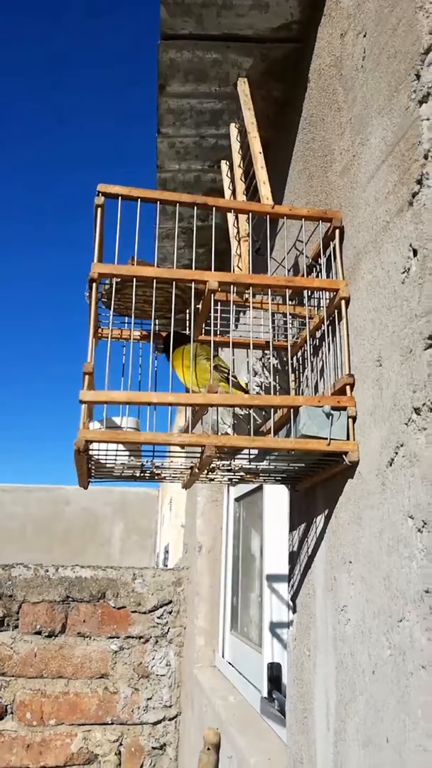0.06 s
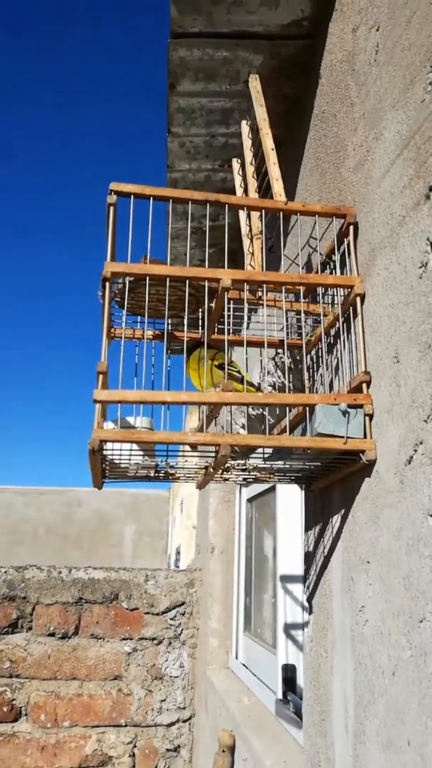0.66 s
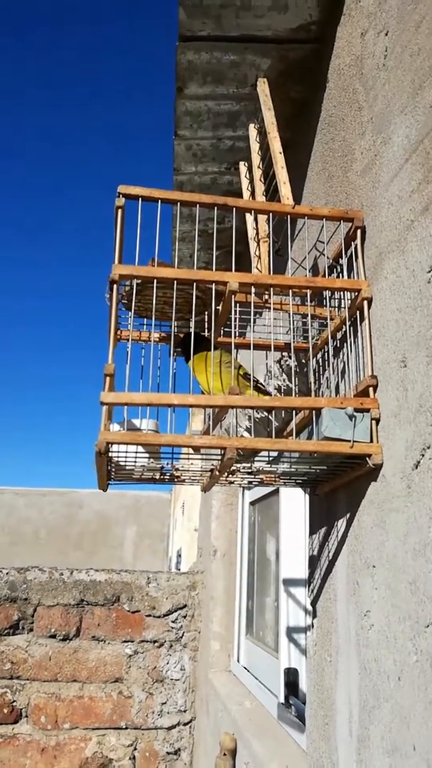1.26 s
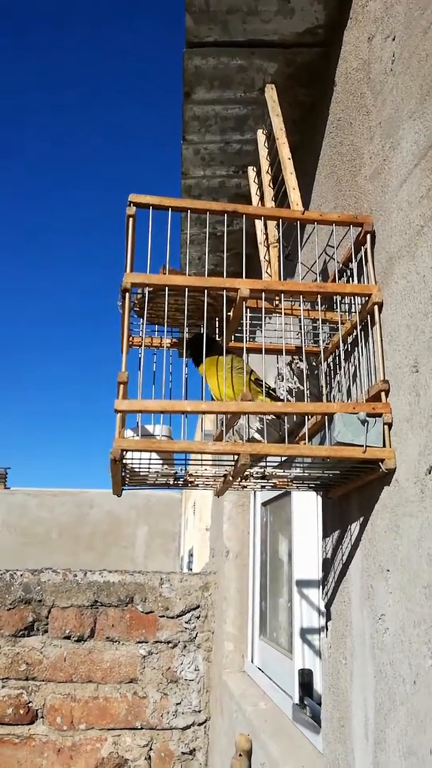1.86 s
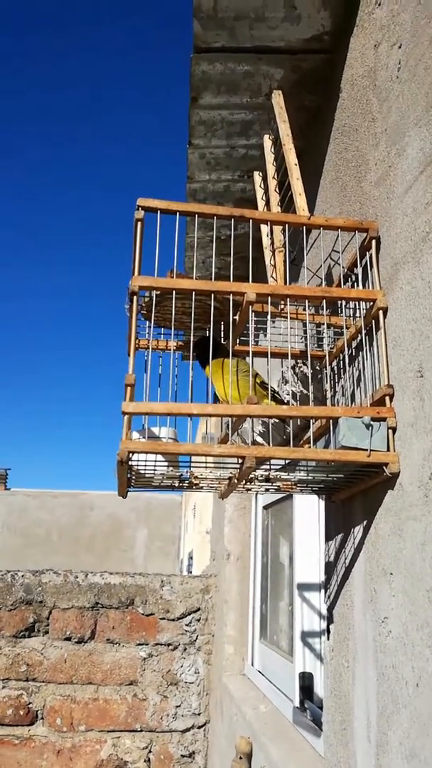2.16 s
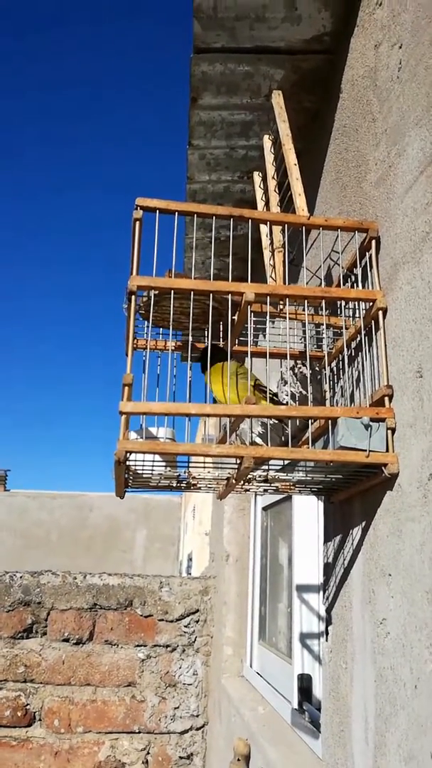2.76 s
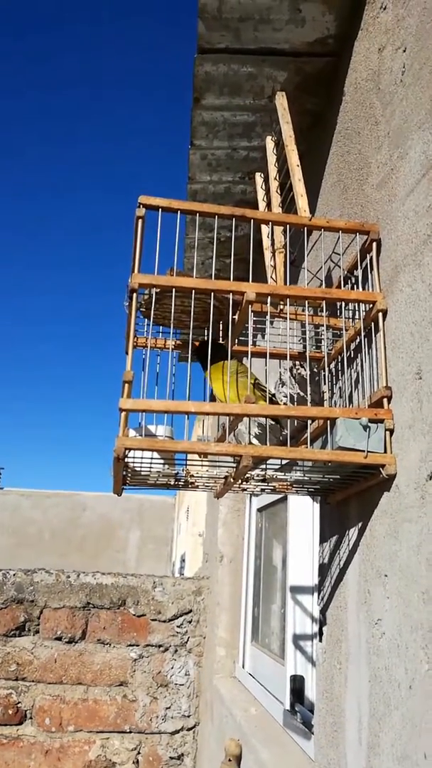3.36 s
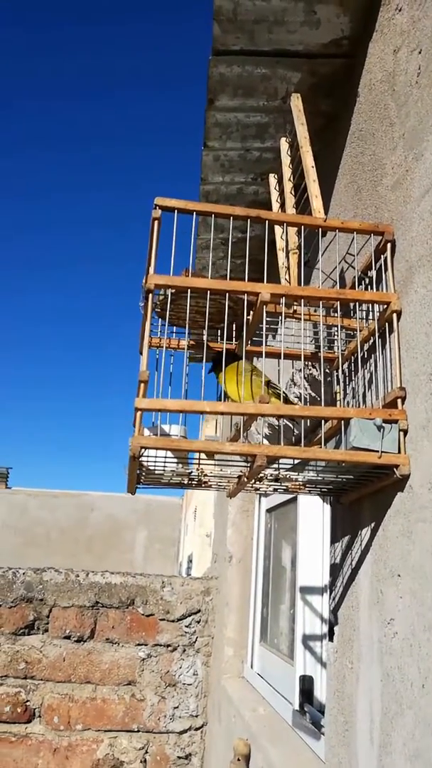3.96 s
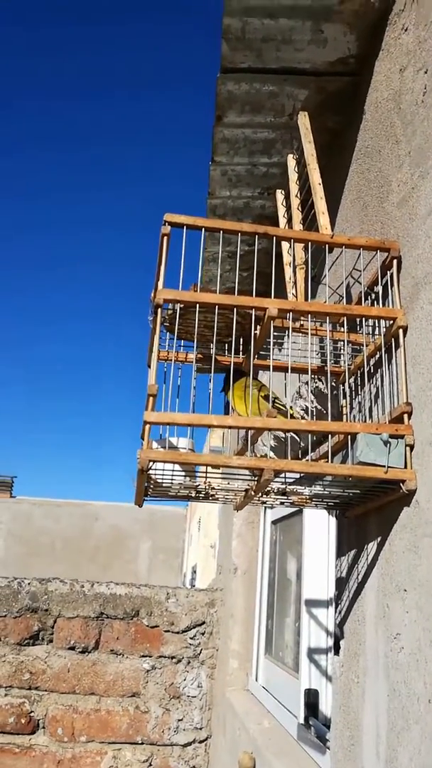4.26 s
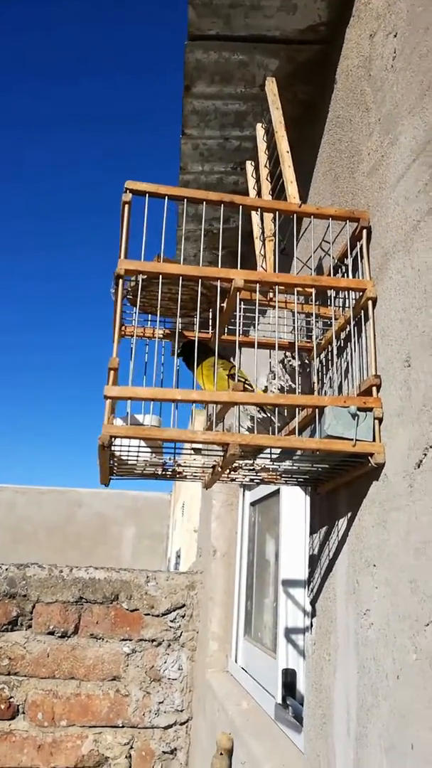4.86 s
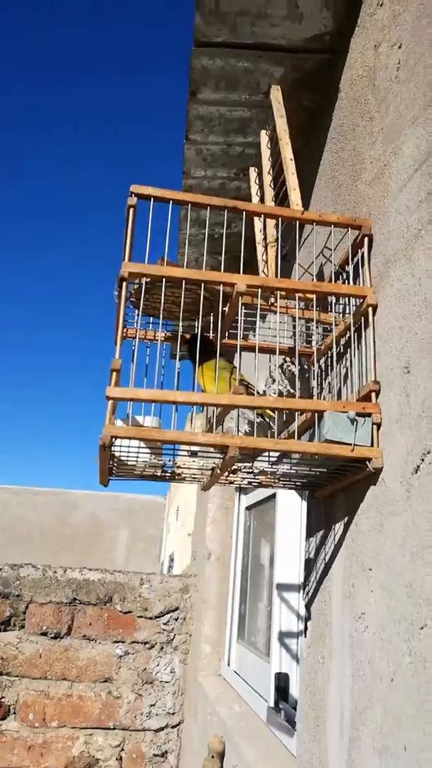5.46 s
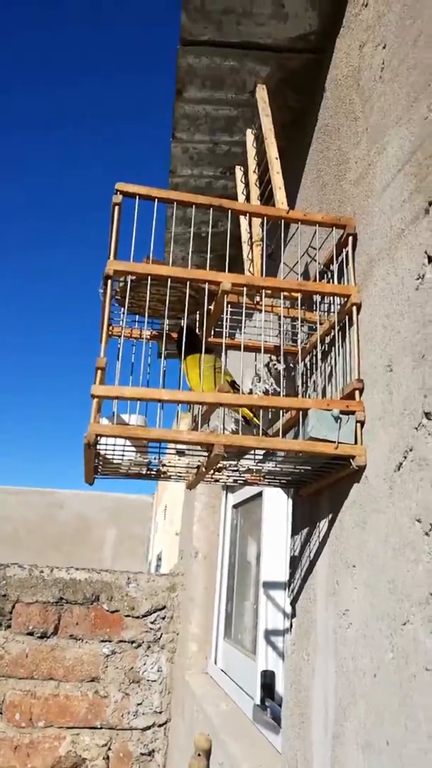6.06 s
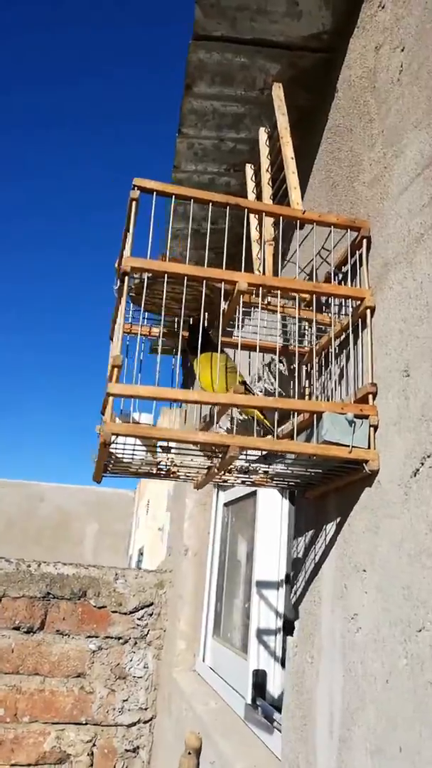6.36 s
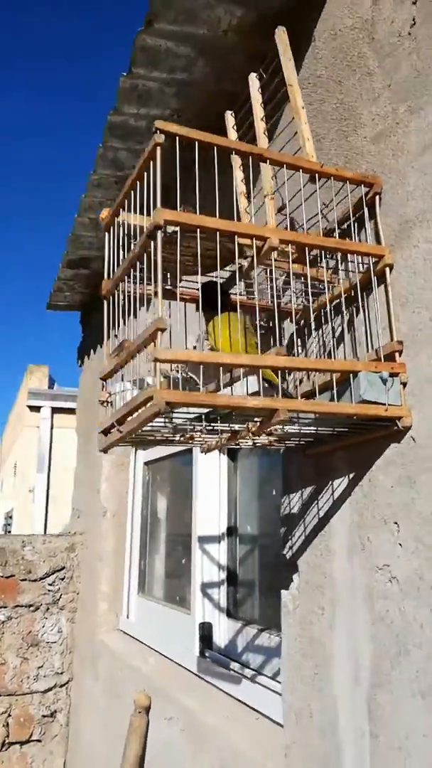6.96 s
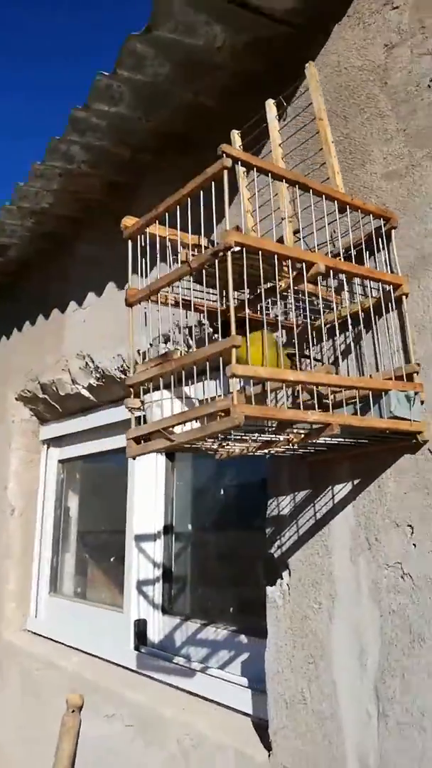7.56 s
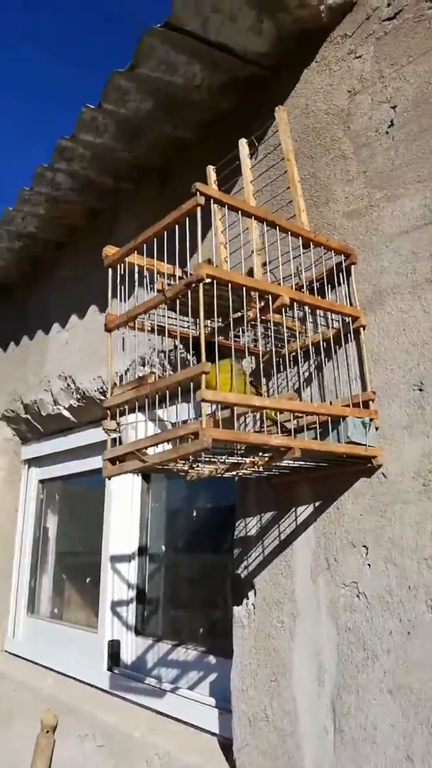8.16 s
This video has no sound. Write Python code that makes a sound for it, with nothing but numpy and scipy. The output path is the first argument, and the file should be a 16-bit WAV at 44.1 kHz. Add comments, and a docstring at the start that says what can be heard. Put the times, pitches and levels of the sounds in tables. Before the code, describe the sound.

A small caged finch sings outdoors, fairly near and slightly to the right, with a short echo off the walls. It starts at once with squeaky chatter and a few rough buzzes, then bright, quick pips from about 0.9 seconds. Short trills and a run of hoarse chips follow between 1.4 and 2.6 seconds. From 2.7 to 3.4 seconds a rattling twitter repeats four times, leading into clear falling whistles and trills until about 4.5 seconds. Scratchy notes, sharp ticks and buzzes carry the warble on to about 6.6 seconds. After that come only a few faint, thin high calls, near 6.8, 7.2 and 8 seconds. Underneath lie a faint low rumble, a low hum and soft air, fading toward the end, with a few gentle breeze bumps on the microphone in the first two seconds or so.

```python
"""Caged finch on a house wall

A small finch sings a long, fast warble from a few syllables that it repeats and varies: squeaks,
buzzes, pips, chips, twitters, hooks, slurs and trills. Its syrinx sounds through one broad throat
resonance; cage, wall and eave scatter each note. Underneath lie faint rumble, a low hum and soft air."""
import sys
import numpy as np
from scipy import signal
from scipy.fft import rfft, irfft, next_fast_len
from scipy.io import wavfile
from scipy.ndimage import map_coordinates

SR = 44100
rng = np.random.default_rng(int(sys.argv[2]) if len(sys.argv) > 2 else 0)


def digitize_waveform(pressure):
    """Quantize a signal to 16-bit integers and store it at the path in sys.argv[1].

    Rows of a 2-D input are taken as channels; values are limited to [-1, 1].
    """
    field = np.atleast_2d(pressure).T
    bounded = np.clip(field, -1, 1)
    quanta = np.round(bounded * 32767).astype(np.int16)
    wavfile.write(sys.argv[1], SR, quanta)


N = 362061
TOP_HZ = 15850


def amp(db):
    """Decibels to gain."""
    return 10 ** (np.asarray(db) / 20)


def unit(x):
    """Scale to rms 1."""
    return x / np.sqrt(np.mean(x ** 2))


def along(points, hz):
    """Read (Hz, value) points on a log axis."""
    f, v = np.transpose(points)
    return np.interp(np.log(hz + 1), np.log(f), v)


def wobble(rate_hz, size):
    """Smooth random curve, rate_hz knots a second."""
    at = np.arange(size) * rate_hz / SR
    return map_coordinates(rng.standard_normal(int(at[-1]) + 2), [at], mode="nearest")


def filtered(x, response):
    """Apply a complex frequency response."""
    m = next_fast_len(N + SR // 2)
    return irfft(rfft(x, m) * response(np.fft.rfftfreq(m, 1 / SR)), m)[..., :N]


def rush(spectrum, width):
    """Coloured stereo noise of rms 1; width is side over mid."""
    mid, side = filtered(rng.standard_normal((2, N)), lambda hz: amp(along(spectrum, hz)))
    return unit(np.array([mid + width * side, mid - width * side]))


# Noise spectra. Each row: frequency in Hz, relative density in dB.
RUMBLE_SPECTRUM = [(25, 4), (85, 6), (250, -9), (450, -27.5), (2000, -85.5)]
AIR_SPECTRUM = [(550, -3), (1100, 2), (2500, -10), (6000, -21), (10000, -29), (15000, -28)]
# Background fade. Each row: time in seconds, rumble in relative dB, air and hum in relative dB.
BACKGROUND_FADE = [(1.4, -56, -64.5), (2.5, -60, -63), (4.499, -62, -66), (6.499, -62.5, -67.5),
                   (7.199, -63, -77), (8.2, -73.5, -75.5)]
# Breeze on the microphone. Each row: peak time in seconds, level in dB.
THUMPS = [(0.257, -49), (.4, -46), (0.884, -44), (1.267, -44), (1.39, -48.5), (2.205, -45.5)]

def background(rumble_db, air_db, hum_db, hum_hz, gust_db, thump_s=0.011):
    """Rumble, lumpy and thumping in the breeze, a faint wavering hum and a wash of air."""
    t = np.arange(N) / SR
    times, *fades = np.transpose(BACKGROUND_FADE)
    low_db, high_db = (np.interp(t, times, fade) for fade in fades)
    lumps_db = gust_db * amp(low_db - low_db.max()) * wobble(23, N)
    thumps = sum(amp(db) * np.exp(-((t - at) / thump_s) ** 2) for at, db in THUMPS)
    rumble = (amp(low_db + rumble_db + lumps_db) + thumps) * rush(RUMBLE_SPECTRUM, width=0.22)
    hum = amp(high_db + hum_db) * np.sin(2 * np.pi * hum_hz * t + wobble(10, N))
    return rumble + hum + amp(high_db + air_db) * rush(AIR_SPECTRUM, width=0.83)


def yard_echo(x, db, t60_s):
    """Stereo reflections that start after the shortest detour and die away."""
    age = np.arange(SR // 2) / SR
    tail = rng.standard_normal((2, len(age))) * amp(-60 * age / t60_s) * (age > 0.0015)
    return amp(db) * signal.fftconvolve(x, tail / np.linalg.norm(tail[0]), axes=1)[:, :N]


def cage_scatter(db, count):
    """Direct path plus quick reflections off cage and wall, new each note as the bird turns its head."""
    delays = (rng.uniform(0.0008, 0.014, count) * SR).astype(int)
    paths = np.bincount(delays, amp(db) * rng.uniform(-1, 1, count))
    paths[0] = 1
    return paths


# Stereo shading. Each row: frequency in Hz, left minus right in dB.
BALANCE = [(2000, 3.5), (4000, -3), (6000, -9.5), (9000, -21), (13000, 1)]

def from_the_right(song, lag_ms):
    """The bird reaches the left side later and shaded."""
    def response(hz):
        left = amp(along(BALANCE, hz)) * np.exp(-2j * np.pi * hz * lag_ms / 1000)
        return np.array([left, np.ones_like(left)]) / np.sqrt((1 + abs(left) ** 2) / 2)
    return filtered(song, response)


# Resonance of throat and beak at gape 1. Each row: frequency in Hz, gain in dB.
THROAT = [(600, -85.5), (1300, -9), (2300, -5.5), (3200, 2), (4200, 15), (5200, 11.5), (6500, 5),
          (9500, -22.5), (13000, -30), (15500, -35)]

def syrinx(length_s, glide_hz, gape, vibrato, jitter_hz, wander, rattle, flutter, sub_db, slope, peaked,
           hiss_db=-38):
    """One note: overtones of a bending pitch sweep through the throat resonance, over a hiss of air."""
    size = int(length_s * SR)
    u = np.arange(size) / size
    log_glide = np.log(glide_hz) + 0.02 * rng.standard_normal(3)
    pitch = np.exp(np.polyval(np.polyfit([0, 0.5, 1], log_glide, 2), u))
    vibrato_hz, depth = vibrato or (0, 0)
    pitch *= 1 - depth * (1 - u) * np.sin(2 * np.pi * vibrato_hz * length_s * u)
    pitch *= np.exp(wander * wobble(110, size))
    pitch += jitter_hz * wobble(1000, size)  # high notes stay pure, low ones scratch
    # The other side of the syrinx rattles at the start of wide glides.
    rattle_hz = np.geomspace(*rng.uniform(500, 1600, 2), size)
    rattle_depth = rattle * np.ptp(np.log(glide_hz)) * np.exp(-u * length_s / 0.0064)
    pitch *= 1 + rattle_depth * np.sin(2 * np.pi * np.cumsum(rattle_hz) / SR)
    # Uneven alternate cycles put weak lines halfway between the harmonics.
    k = np.arange(2, 2 * TOP_HZ / min(glide_hz))[:, None] / 2
    partial_db = along(THROAT, k * abs(pitch) / gape) + sub_db * (k % 1 > 0)
    strength = amp(partial_db) * k ** -slope * (k * pitch < SR / 2)
    cycles = k * np.cumsum(pitch) / SR + rng.random(k.shape)
    tone = unit(np.sum(strength * np.sin(2 * np.pi * cycles), axis=0))
    tone += amp(hiss_db) * rng.standard_normal(size)
    swell = np.sin(np.pi * u ** np.sqrt(peaked)) ** peaked
    flicker = np.exp(flutter * (wobble(260, size) + wobble(3000, size)))
    return unit(tone * swell * flicker)


# Beak opening. Each row: time in seconds, factor on the throat's frequencies.
GAPE = [(.4, 0.9), (.75, 0.87), (1.0, 0.96), (4.9, 0.98), (5.1, 1.058), (6.4, 0.87)]

def sing(notes, **voice):
    """Place each note at its time and level, with its own reflections in each channel."""
    song = np.zeros((2, N + SR))
    for s, length_s, start_hz, middle_hz, end_hz, db, *vibrato in notes:
        gape = np.interp(s, *np.transpose(GAPE))
        syllable = syrinx(length_s, (start_hz, middle_hz, end_hz), gape, vibrato, **voice)
        for channel in song:
            heard = signal.fftconvolve(syllable, cage_scatter(db=-14.5, count=10))
            channel[round(s * SR):][:len(heard)] += amp(db) * heard
    return song[:, :N]


def bent(rows, bend):
    """Notes with one contour; bend is start and end pitch over middle pitch."""
    return [(s, length_s, hz * bend[0], hz, hz * bend[1], *rest) for s, length_s, hz, *rest in rows]


def brief(rows, length_s, bend):
    """Notes with one contour and one length."""
    return bent([(s, length_s, hz, db) for s, hz, db in rows], bend)


def repeated(notes, rows):
    """A set syllable sung at each row's time, level and pitch factor."""
    return [(s + delay_s, length_s, *(factor * np.array(glide_hz)), db + note_db)
            for s, db, factor in rows for delay_s, length_s, *glide_hz, note_db in notes]


# Each row: start and length in seconds, start, middle and end pitch in Hz, level in dB.
HIGH_CALLS = [(6.77, 0.026, 11040, 8760, 6890, -45), (7.232, 0.03, 9540, 8130, 5720, -52),
              (7.63, 0.019, 6600, 7100, 7140, -68), (8.033, 0.025, 4300, 5360, 6480, -44.5)]

def high_calls():
    """Thin, faint glides after the song."""
    return sing(HIGH_CALLS,
                jitter_hz=55, wander=0.007, rattle=0.02, flutter=0.16, sub_db=-22, slope=3, peaked=1)


# Each row: start in seconds, pitch in Hz, level in dB.
SQUEAKS = [(.083, 2590, -33.5), (.106, 2360, -31), (.243, 2783, -37.5), (.261, 2390, -32.5),
           (.282, 2340, -32.5), (.339, 2084, -33), (.359, 2594, -36.5), (.378, 2290, -32),
           (.428, 2780, -38), (.453, 2720, -33), (.471, 2263, -29), (.528, 2980, -36), (.565, 2260, -31.5)]

def squeaks():
    """Little arches of pitch: the opening chatter."""
    return sing(brief(SQUEAKS, length_s=0.026, bend=(0.67, 0.64)),
                jitter_hz=75, wander=0.045, rattle=0.07, flutter=0.27, sub_db=-11, slope=0.51, peaked=0.9)


# Each row: start and length in seconds, pitch in Hz, level in dB.
BUZZES = [(0.618, 0.031, 1484, -38), (0.666, 0.04, 842, -35), (0.721, 0.037, 1230, -39.5),
          (0.784, 0.035, 1540, -36), (1.762, 0.031, 2817, -32), (1.843, 0.037, 2150, -34),
          (1.932, 0.038, 1470, -37.5), (2.44, 0.021, 1356, -32.5), (2.572, 0.032, 2009, -28.5),
          (3.449, 0.053, 1069, -32.5), (3.738, 0.037, 1014, -35.5), (4.835, 0.039, 2190, -41),
          (5.002, 0.0206, 1110, -41), (5.141, 0.012, 1060, -40), (5.676, 0.012, 893, -29),
          (5.692, 0.036, 3000, -35.5), (6.175, 0.01, 1012, -35.5), (6.411, 0.035, 1932, -29),
          (6.538, 0.046, 903, -33.5)]

def buzzes():
    """Low, rough notes rich in overtones; the syrinx beats unevenly."""
    return sing(bent(BUZZES, (0.73, 0.9)),
                jitter_hz=26, wander=0.06, rattle=0.05, flutter=0.17, sub_db=-16, slope=0.51, peaked=1)


# Each row: start and length in seconds, pitch in Hz, level in dB, vibrato in Hz, depth as share of pitch.
TRILLS = [(0.128, 0.071, 2203, -33.5, 105.7, 0.15), (1.479, 0.051, 3367, -30, 87.6, 0.081),
          (1.669, 0.051, 2196, -30.5, 70.8, 0.26), (4.109, 0.047, 3615, -32, 63.89, 0.1),
          (4.256, 0.062, 3774, -33.5, 43.3, 0.12), (5.876, .08, 3217, -36.5, 75.6, 0.089),
          (6.149, 0.04, 3764, -29.5, 45.5, 0.12), (6.177, 0.076, 3010, -41, 59.3, 0.09)]

def trills():
    """Sinking notes with a fast, fading vibrato."""
    return sing(bent(TRILLS, (1.08, 0.87)),
                jitter_hz=70, wander=0.017, rattle=0.063, flutter=0.2, sub_db=-22, slope=1.18, peaked=0.95)


# Each row: start and length in seconds, pitch in Hz, level in dB.
CHIPS = [(1.385, 0.034, 2530, -33.5), (1.528, 0.032, 2670, -32), (1.603, 0.0086, 3260, -30),
         (1.783, 0.011, 2590, -31.5), (1.982, 0.026, 2454, -30), (2.033, 0.02, 3057, -29),
         (2.086, 0.021, 3000, -29.5), (2.134, 0.022, 2840, -28), (2.19, 0.025, 2280, -27),
         (2.264, 0.018, 2780, -27.5), (2.32, .022, 2676, -30), (2.379, 0.018, 3612, -26.5),
         (2.441, 0.016, 2338, -25), (2.515, 0.017, 2890, -29.5), (5.029, .011, 2740, -32),
         (5.162, 0.0085, 2770, -31.5), (5.333, 0.015, 2720, -35), (5.347, 0.048, 3280, -35)]
CHIP_BEND = (0.85, 0.42)

def chips():
    """Hoarse notes that crest and plunge."""
    return sing(bent(CHIPS, CHIP_BEND), hiss_db=-28,
                jitter_hz=55, wander=0.025, rattle=0.05, flutter=0.18, sub_db=-15, slope=0.27, peaked=1.4)


# Each row: start and length in seconds, pitch in Hz, level in dB.
RASPS = [(3.362, .055, 3403, -34), (4.918, .045, 2000, -37.5), (5.038, .056, 2684, -33.5),
         (5.172, 0.045, 2540, -32.5), (5.285, .046, 2350, -41.5), (5.372, 0.039, 2130, -31.5)]

def rasps(scrape_delay_s=0.011, scrape_s=0.021, scrape_db=-12):
    """The syrinx beats unevenly: scratchy notes, and a scrape an octave down ending each tick."""
    scrapes = [(s + scrape_delay_s, scrape_s, hz / 2, db + scrape_db) for s, hz, db in TICKS]
    return sing(bent(RASPS, (0.97, 0.75)) + bent(scrapes, CHIP_BEND),
                jitter_hz=85, wander=0.11, rattle=0.06, flutter=0.28, sub_db=-6, slope=0.4, peaked=0.6)


# Hooks go quickly up and slowly down after a twitter; high swoops come from the syrinx's other side.
# Each row: delay and length in seconds, start, middle and end base pitch in Hz, relative level in dB.
HOOK_NOTES = [(0, .018, 1818, 3744, 4850, -10), (.011, 0.021, 4590, 4230, 3360, -1)]
SWOOP_NOTES = [(0.002, .033, 19000, 7510, 11300, -1.5)]
# Each row: start in seconds, level in dB, pitch factor.
HOOKS = [(2.761, -26.5, 0.92), (2.935, -24.5, 0.97), (3.101, -21.5, 1.06), (3.273, -21.5, 0.91),
         (3.384, -37.5, 0.98)]
SWOOPS = [(2.003, -34.5, 1.03), (3.117, -40.5, 1.12), (3.86, -39, 1.1)]
# Each row: start in seconds, lower pitch in Hz, level in dB.
CHORDS = [(2.702, 4650, -28.5), (2.873, 4400, -24.5), (3.044, 4550, -28.5), (3.217, 4600, -33),
          (4.694, 4400, -28.5)]

def figures(upper_ratio=1.21, upper_db=-3):
    """Fast rattling hooks, swoops and chords; in a chord both sides of the syrinx beat together."""
    upper = [(s, hz * upper_ratio, db + upper_db) for s, hz, db in CHORDS]
    chords = brief(CHORDS + upper, length_s=0.0263, bend=(0.93, 0.91))
    return sing(chords + repeated(HOOK_NOTES, HOOKS) + repeated(SWOOP_NOTES, SWOOPS),
                jitter_hz=130, wander=0.035, rattle=0.15, flutter=0.13, sub_db=-21, slope=0.35, peaked=0.9)


# Each row: start and length in seconds, pitch in Hz, level in dB, fall in octaves (negative rises).
SLURS = [(0.864, 0.035, 6300, -40, 0.1), (3.486, 0.064, 4750, -31, 0.24), (3.551, 0.027, 6700, -31.5, 0.56),
         (3.578, 0.079, 4773, -23.5, 0.4), (3.854, 0.053, 4466, -33.5, 0.095),
         (3.861, 0.064, 6360, -35.5, 0.051), (3.965, 0.048, 4460, -23.5, 0.026),
         (3.967, 0.063, 5430, -32.5, 0.28), (4.017, 0.053, 4330, -30, 0.3),
         (4.172, 0.045, 4904, -24.5, 0.29), (4.317, 0.05, 5100, -26, 0.51),
         (4.415, 0.028, 4240, -23.5, 0.31), (4.451, 0.022, 5320, -31.5, -0.27),
         (4.467, 0.033, 5150, -25, 0.32), (4.872, 0.047, 2703, -37.5, .05),
         (5.856, 0.014, 4000, -22, 0.096), (6.132, 0.0087, 4095, -22, -0.063)]

def slurs(early_share=0.55):
    """Clear whistles, mostly falling, a little faster in the first half."""
    notes = [(s, length_s, hz * 2 ** (fall * early_share), hz, hz / 2 ** (fall * (1 - early_share)), db)
             for s, length_s, hz, db, fall in SLURS]
    return sing(notes,
                jitter_hz=55, wander=0.015, rattle=0.51, flutter=0.043, sub_db=-22.5, slope=0, peaked=0.81)


# Each row: start in seconds, pitch in Hz, level in dB.
PIPS = [(0.874, 4510, -29), (0.961, 5320, -27.5), (1.047, 4616, -21), (1.134, 4616, -22.5),
        (1.228, 5270, -26), (1.316, 6410, -26.5), (1.624, 4780, -22), (1.851, 4780, -22.5),
        (1.872, 4470, -27.5), (3.779, 4670, -24.5), (3.797, 5180, -27), (3.814, 5570, -30),
        (6.42, 3916, -27.5)]  # upslurs that level off
GRACES = [(0.929, 5200, -35.5), (1.008, 5100, -30.5), (1.098, 5750, -34), (1.207, 6030, -36.5),
          (3.844, 6200, -35.5)]  # thin rises between the pips
TICKS = [(4.546, 5850, -30), (4.654, 4820, -37.5), (5.466, 6430, -29), (5.533, 5890, -29),
         (5.593, 4920, -31), (5.671, 6410, -22), (5.799, 6950, -25.5), (6.07, 5970, -25)]  # steep downstrokes
TWITTER_FLICKS = [(2.66, 5370, -32.5), (2.677, 5430, -25), (2.688, 4524, -22.5), (2.695, 4550, -25.5),
                  (2.858, 4840, -27.5), (2.864, 6030, -29.5), (3.019, 5470, -28), (3.032, 5160, -26.5),
                  (3.186, 5420, -25), (3.198, 4610, -24.5), (3.207, 4760, -29), (3.23, 5920, -27)]  # steep upstrokes
# Each row: start and length in seconds, pitch in Hz, level in dB.
RISES = [(1.318, 0.018, 4440, -30.5), (1.456, .028, 2790, -36), (2.834, 0.023, 5980, -33),
         (3.484, 0.024, 2670, -35.5), (3.524, 0.025, 5220, -26.5), (3.764, 0.024, 2250, -38),
         (4.398, 0.019, 3710, -30.5), (4.574, .042, 5130, -26.5), (4.679, 0.02, 3810, -27),
         (5.479, 0.012, 4340, -30.5), (5.606, 0.016, 4490, -32), (8.056, 0.039, 4620, -37)]

def whistles():
    """Short, nearly pure glides."""
    notes = (brief(PIPS, length_s=0.018, bend=(0.7, 0.88))
             + brief(GRACES, length_s=0.024, bend=(0.92, 1.8))
             + brief(TICKS, length_s=0.015, bend=(0.82, 0.56))
             + brief(TWITTER_FLICKS, length_s=0.0095, bend=(0.78, 1.25))
             + bent(RISES, (0.59, 1.33)))
    return sing(notes,
                jitter_hz=55, wander=0.016, rattle=0.23, flutter=0.09, sub_db=-18, slope=0.18, peaked=1.4)


def finch(lowest_hz):
    """The whole warble, with little sound below lowest_hz."""
    song = whistles() + slurs() + figures() + trills() + chips() + squeaks() + rasps() + buzzes()
    return filtered(song, lambda hz: 1 - 1 / (1 + (hz / lowest_hz) ** 6))


def scene():
    """The bird, its echo in the yard and the outdoor background."""
    song, calls = finch(lowest_hz=980), high_calls()
    yard = yard_echo(song, db=-17.5, t60_s=0.29) + yard_echo(calls, db=-4.5, t60_s=0.34)
    outdoors = background(rumble_db=3, air_db=3, hum_db=-5.5, hum_hz=242, gust_db=3.5)
    return from_the_right(song + calls, lag_ms=0.11) + yard + outdoors


def record(dry):
    """Brick-wall low-pass at TOP_HZ."""
    return filtered(dry, lambda hz: hz < TOP_HZ)


dry = scene()
out = record(dry)
digitize_waveform(out)
```